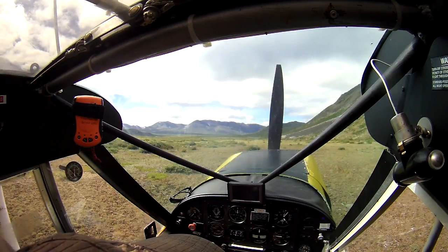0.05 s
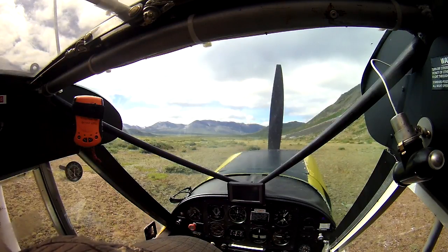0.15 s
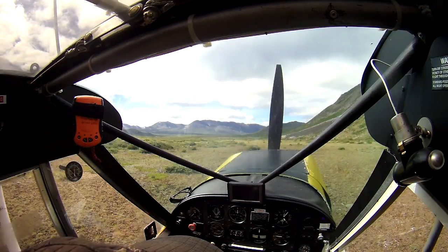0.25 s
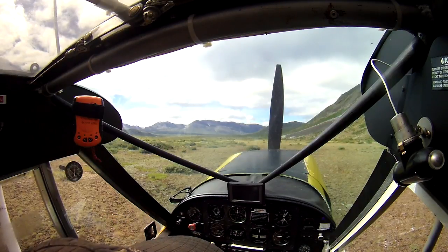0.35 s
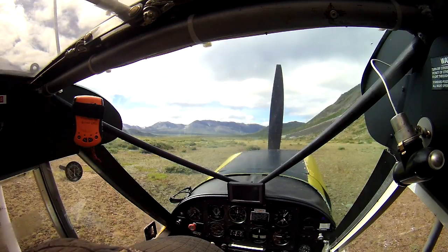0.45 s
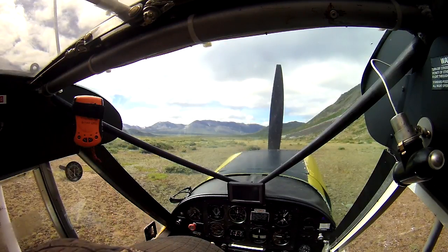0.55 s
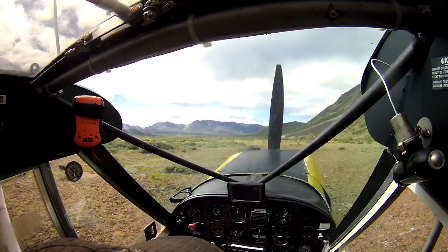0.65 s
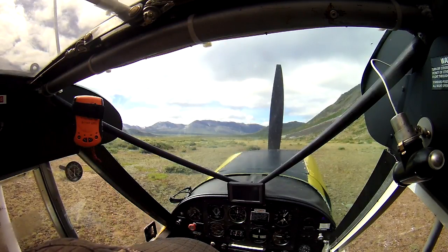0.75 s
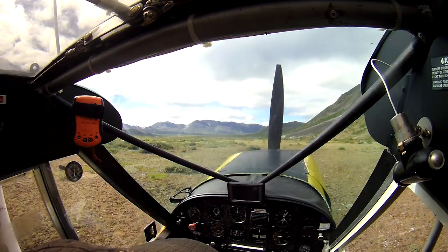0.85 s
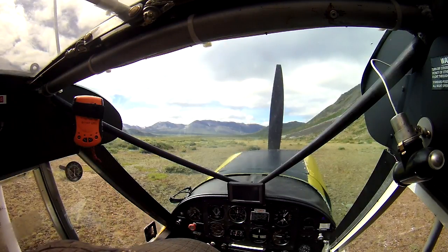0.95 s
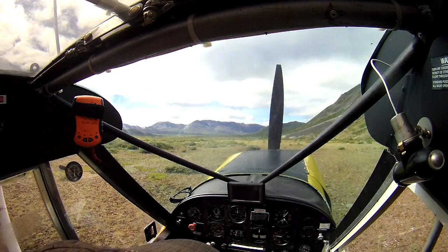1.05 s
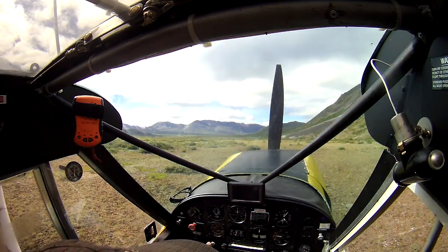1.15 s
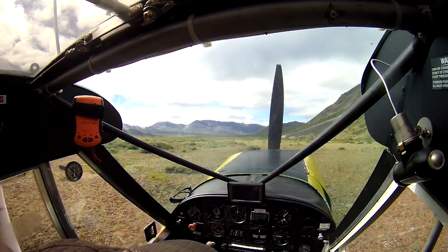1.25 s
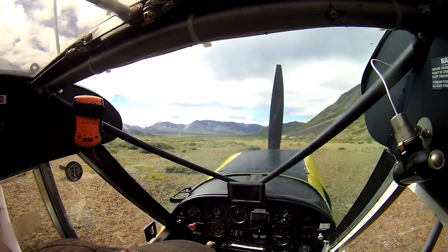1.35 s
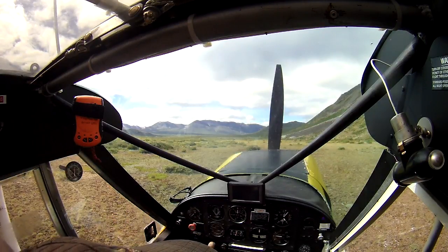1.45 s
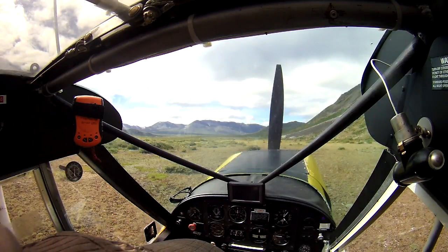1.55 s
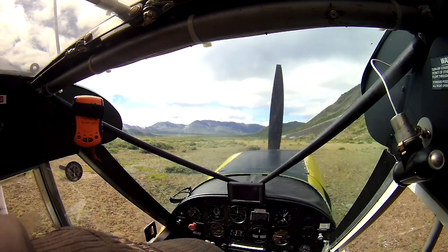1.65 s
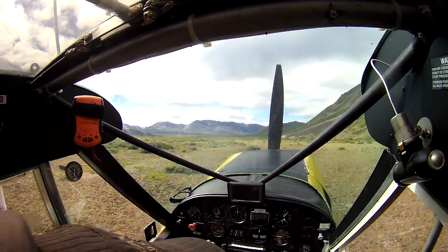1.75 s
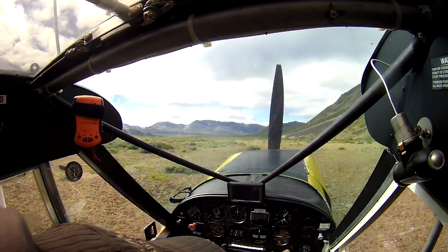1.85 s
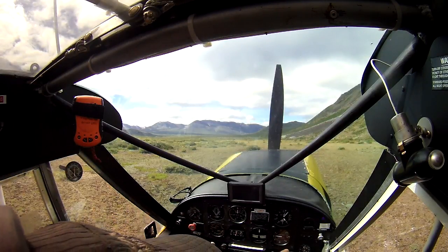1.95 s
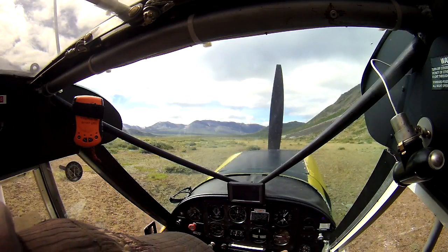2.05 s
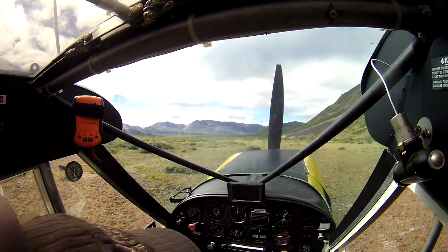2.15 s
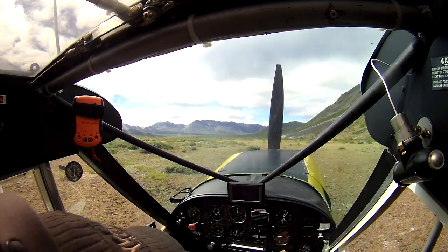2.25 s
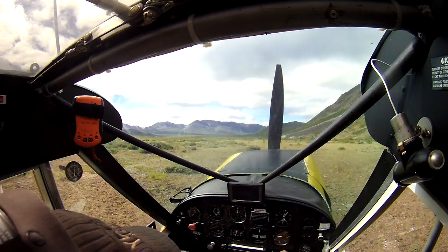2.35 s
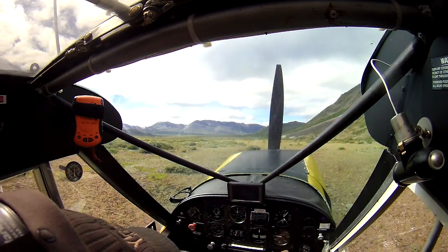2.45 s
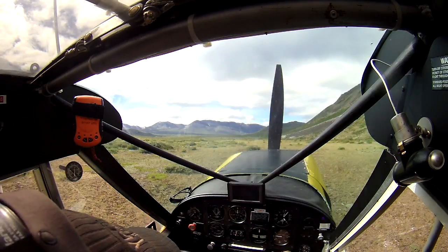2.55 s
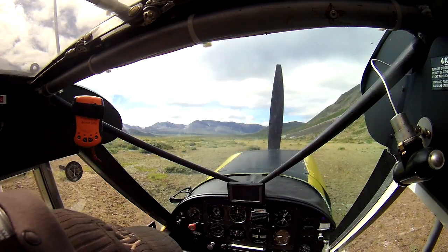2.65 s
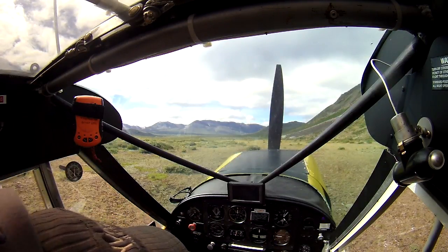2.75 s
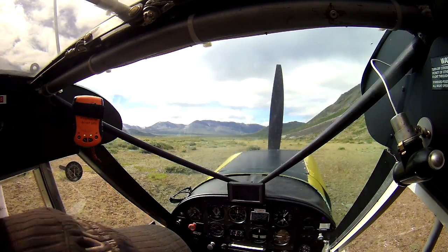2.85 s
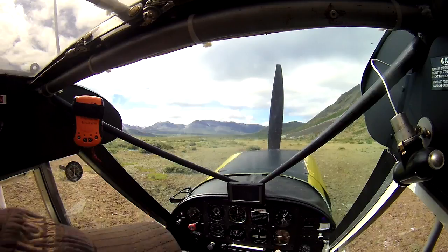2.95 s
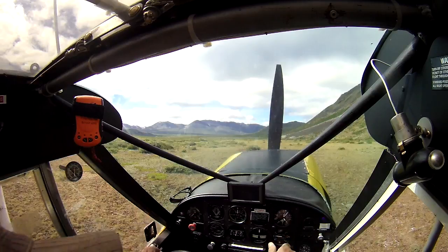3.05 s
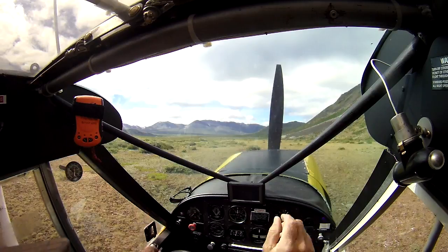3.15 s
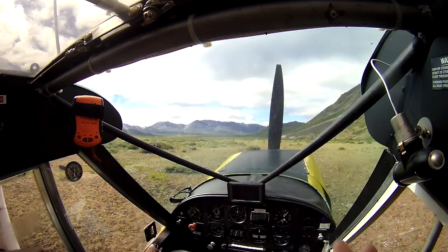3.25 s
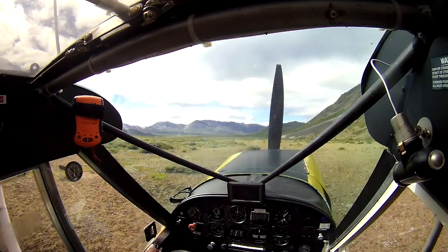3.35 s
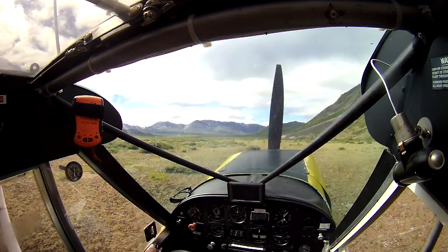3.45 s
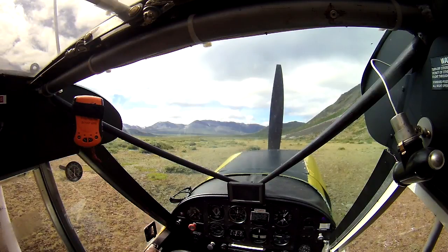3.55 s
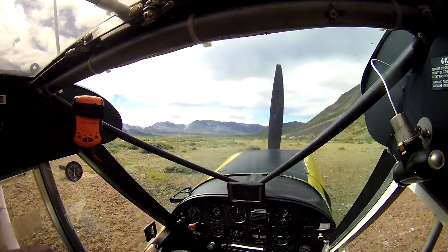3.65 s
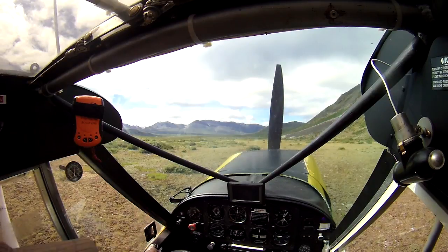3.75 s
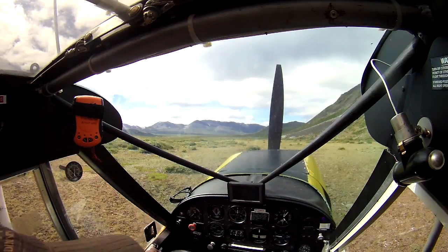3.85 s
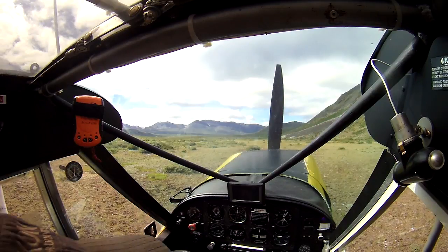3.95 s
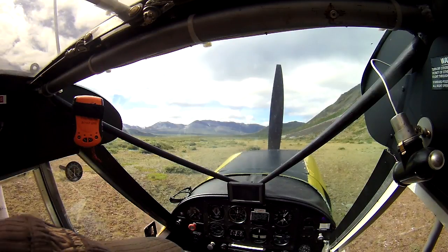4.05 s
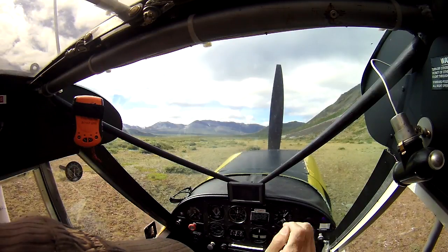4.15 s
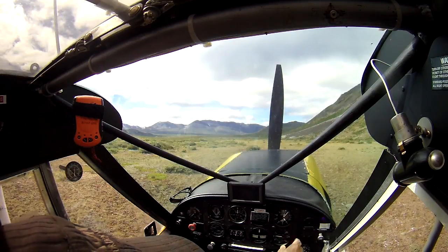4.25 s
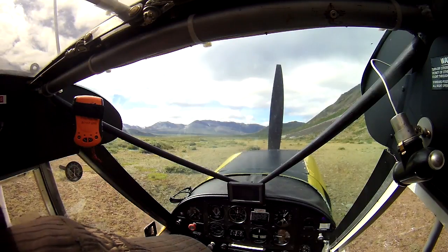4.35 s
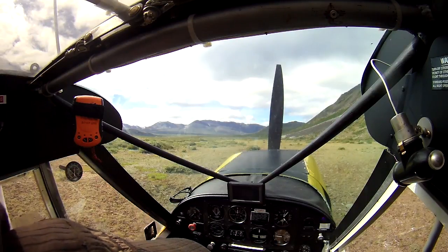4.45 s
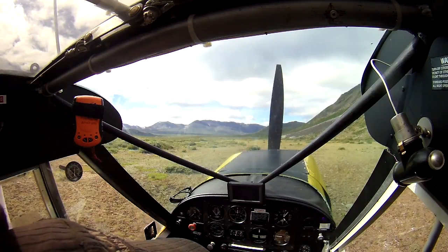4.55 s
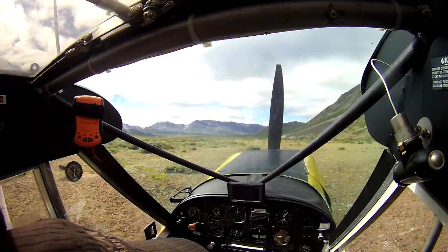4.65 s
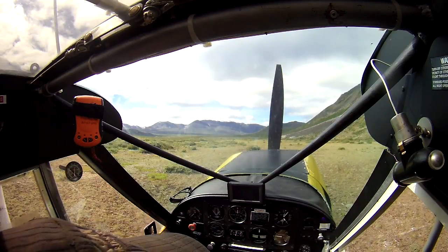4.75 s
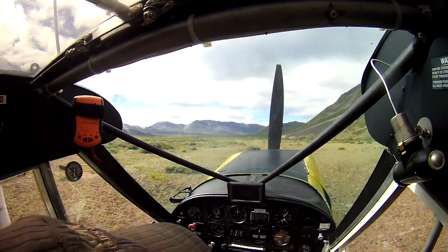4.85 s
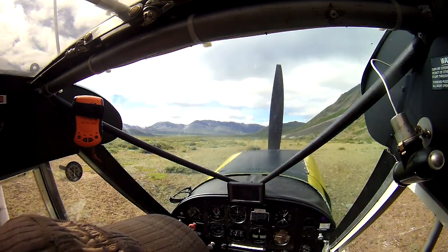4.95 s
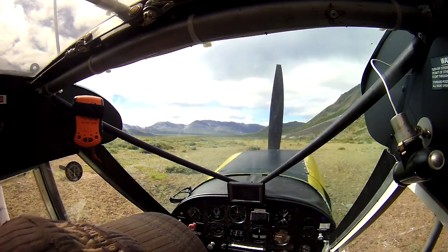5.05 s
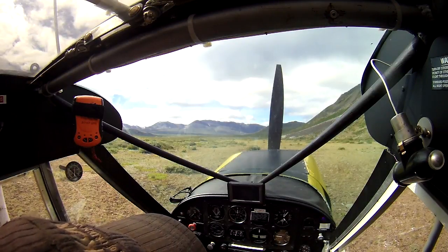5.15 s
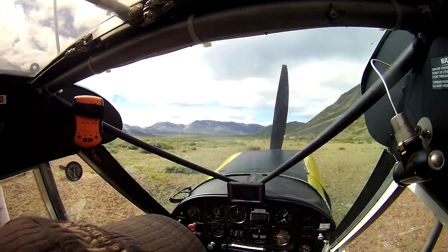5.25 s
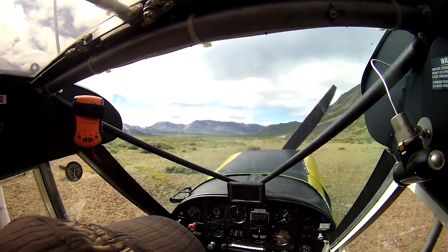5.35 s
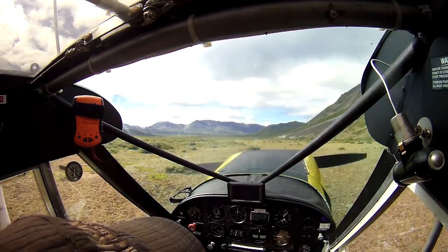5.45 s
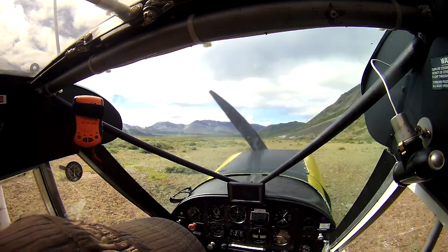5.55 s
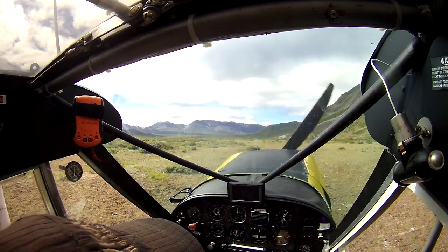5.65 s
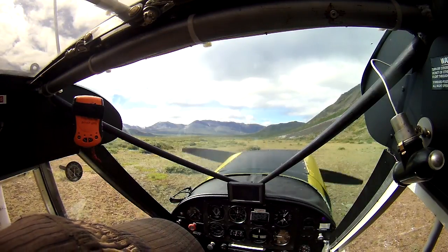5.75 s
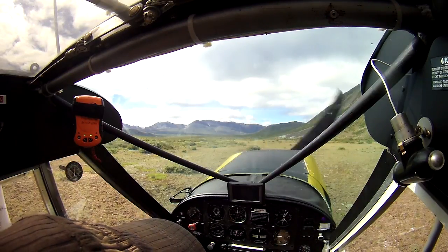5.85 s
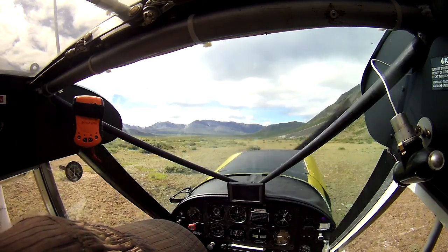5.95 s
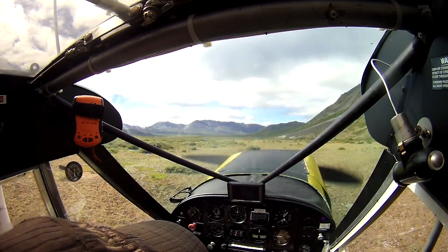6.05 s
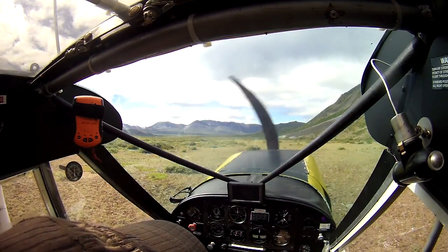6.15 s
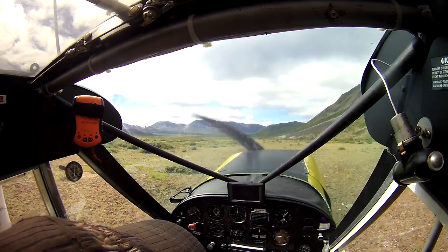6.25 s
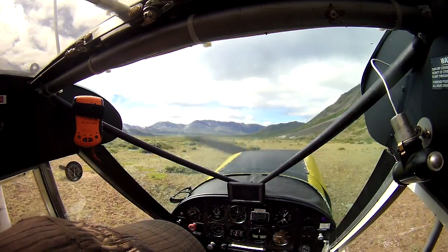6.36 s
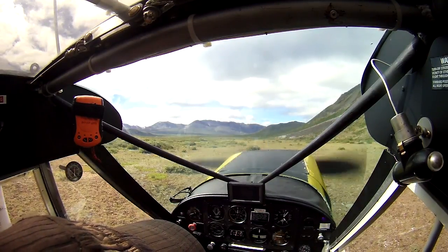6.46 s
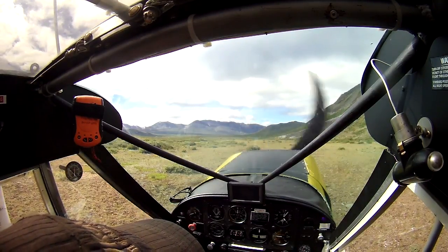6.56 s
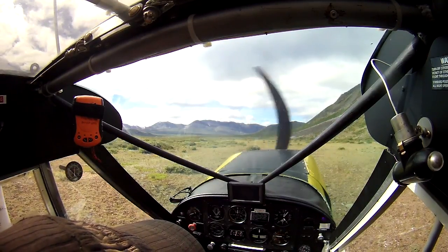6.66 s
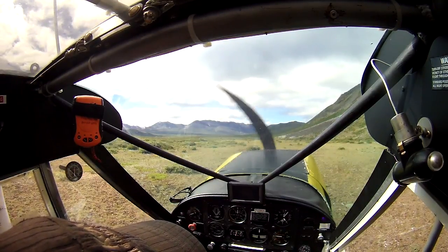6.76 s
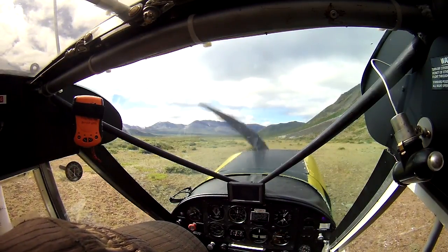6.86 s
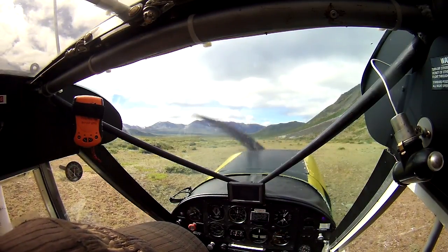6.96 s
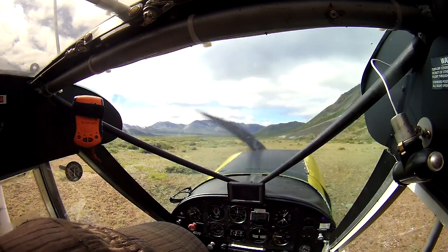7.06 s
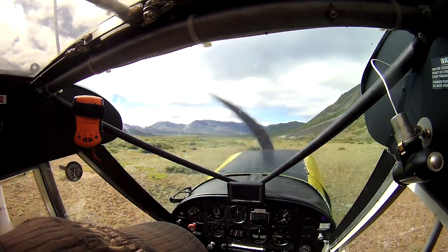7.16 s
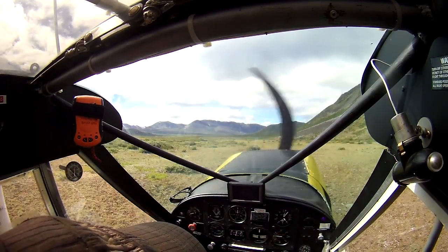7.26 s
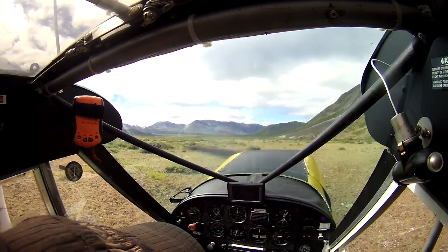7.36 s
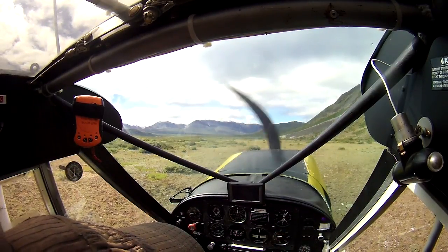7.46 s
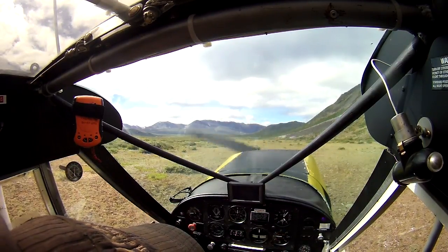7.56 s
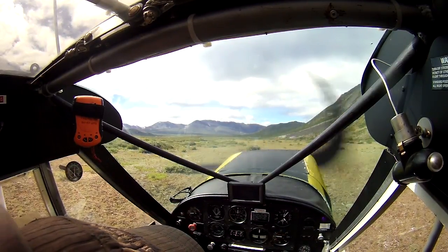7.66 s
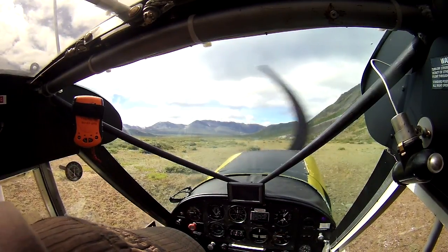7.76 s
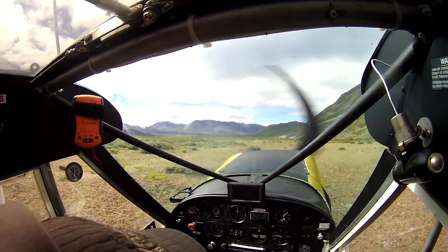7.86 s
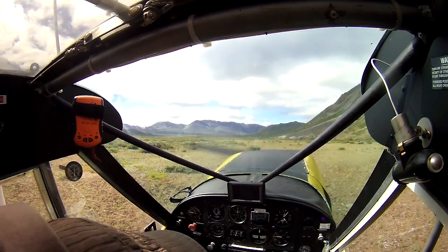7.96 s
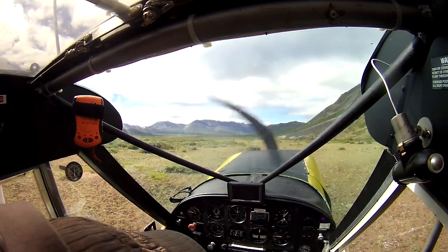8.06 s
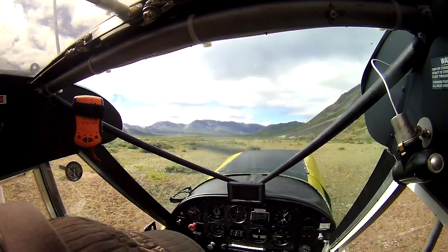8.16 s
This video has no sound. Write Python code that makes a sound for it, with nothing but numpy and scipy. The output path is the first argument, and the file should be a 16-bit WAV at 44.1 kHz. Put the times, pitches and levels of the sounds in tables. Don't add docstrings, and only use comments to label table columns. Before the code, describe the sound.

Inside a small piston aircraft, a microphone enclosed in a hard plastic case gives a boxy, ringing midrange and dull treble. From 0 to 5 s it is quiet: low wind rumble, slight hiss, a faint low panel hum swelling in gusts. Small ticks and switch clicks appear around 1.3, 2.4, 2.6 and 2.9 s, with soft sleeve rubs, strongest near 2.1 and from 3.3 to 4.2 s. A much louder sharp click cracks at 3.8 s. At 5.2 s a double clack and thump start the cranking; a low starter whine rises, falters and returns until 5.85 s, with metallic snaps and deep kicks through 6.4 s. The engine then catches, firing in slow separate throbs that speed up unevenly and grow stronger until the end at about 8 s, with rumble, drone and pulsing valve clatter. A loose part taps and buzzes most near 7.9 s.

```python
import sys
import numpy as np
from scipy import signal
from scipy.fft import rfft, irfft
from scipy.io import wavfile
from scipy.ndimage import uniform_filter1d

SR = 44100
rng = np.random.default_rng(int(sys.argv[2]) if len(sys.argv) > 2 else 0)


def boost_factor(decibels):
    exponent = np.asarray(decibels, float) / 20
    return 10 ** exponent


def to_wav(sig):
    pcm = np.clip(np.atleast_2d(sig), -1, 1) * 32767
    pcm = np.round(pcm).astype(np.int16)
    wavfile.write(sys.argv[1], SR, pcm.T)


N = 361619

# (mode_hz, width_hz, level_db)
CASE = [(381, 95, -13), (701, 143, -11.5), (917, 180, -18), (1236, 97, -3), (1884, 198, -9),
        (2004, 150, -2.5), (2280, 192, 3.5), (2737, 410, -12.5), (3210, 76, -12)]
WALL = signal.ellip(5, 1, 45, 3556, fs=SR, output="sos")


def unit(x):
    return x / np.sqrt(np.mean(x ** 2))


def curves(table):
    s, *columns = np.transpose(table)
    t = np.arange(N) / SR
    fade_s = .02
    gate = np.clip(np.minimum(t - s[0], s[-1] + fade_s - t) / fade_s, 0, 1)
    return [np.interp(t, s, c) for c in columns] + [gate]


def swells(table, rest_db):
    out = np.zeros(N) + boost_factor(rest_db)
    for s, length, db in table:
        add(out, boost_factor(db) * np.hanning(int(length * SR)), max(s - length / 2, 0))
    return 20 * np.log10(out)


def walk(rate):
    hold = int(SR / rate)
    steps = np.repeat(rng.standard_normal(N // hold + 1), hold)
    slewed = uniform_filter1d(uniform_filter1d(steps, hold), hold)
    return unit(slewed[:N])


def band(x, hz, width):
    return signal.lfilter(*signal.iirpeak(hz, hz / width, fs=SR), x)


def coloured(spectrum):
    hz, db = np.transpose(spectrum)
    shape_db = np.interp(np.log(np.fft.rfftfreq(N, 1 / SR) + 1), np.log(hz), db)
    return unit(irfft(rfft(rng.standard_normal(N)) * boost_factor(shape_db), N))


def ring(hz, t60):
    t = np.arange(int(t60 * SR)) / SR
    soft_start = 1 - np.exp(-4 * hz * t)
    return np.sin(2 * np.pi * hz * t) * 1000 ** (-t / t60) * soft_start


def add(out, x, s):
    i = int(s * SR)
    out[i:i + len(x)] += x[:N - i]


def case(x, modes=CASE, leak_db=-40.5):
    rung = sum(boost_factor(db) * band(band(x, hz, 0.99 * width), hz, 1.63 * width) for hz, width, db in modes)
    leak = boost_factor(leak_db) * band(x, 3100, 2500)
    return signal.sosfilt(WALL, rung + leak)


def seams(x):
    # (centre_hz, width_hz, level_db)
    seam_bands = [(4000, 700, -5), (4850, 1100, 0), (7300, 1500, -18)]
    out = np.zeros(N)
    for k, (hz, width, db) in enumerate(seam_bands):
        out += (-1) ** k * boost_factor(db) * band(band(x, hz, width), hz, width)
    return boost_factor(-42.5) * out


def cabin():
    # (frequency_hz, level_db_per_hz)
    wind_spectrum = [(5, -34), (10, 4.5), (27, 4), (52, -1), (150, -9.5), (300, -20.5), (540, -28.5),
                     (1000, -35), (3500, -44), (4200, -45.5), (8000, -47), (15000, -49.5), (16000, -66)]
    # (centre_s, length_s, level_db)
    rustle_swells = [
        (.75, 0.56, -95),
        (1.65, 0.65, -83.5),
        (2.08, 0.37, -74),
        (2.65, 0.46, -82.5),
        (3.28, 0.59, -77.5),
        (3.57, 0.16, -76.5),
        (4.17, 0.56, -76),
        (4.5, 0.17, -82.5),
        (4.9, 0.78, -95.5),
    ]
    # (centre_s, length_s, level_db)
    hum_swells = [
        (.4, .5, -87),
        (1.2, 0.63, -71.5),
        (1.95, 0.41, -64),
        (2.43, 0.15, -51),
        (3.15, 1, -58.5),
        (3.37, 0.2, -63),
        (3.79, 0.19, -59),
        (4.15, 0.5, -68.5),
        (4.7, 0.28, -64),
    ]
    # (time_s, unused)
    quiet_span = [(0., 0.), (5.17, 0.)]
    _, still = curves(quiet_span)
    wind = coloured(wind_spectrum) * boost_factor(-57.5)
    rub = rng.standard_normal(N) * boost_factor(1.5 * walk(150))
    cloth = unit(case(rub, [(2400, 2500, 0.), (1903, 44.4, 7.5)])) * boost_factor(swells(rustle_swells, -91.5))
    hum = unit(band(rng.standard_normal(N), 198.4, 4.9)) * boost_factor(swells(hum_swells, -80) - 4)
    return wind + still * (cloth + hum)


def clicks():
    # (start_s, peak_db, ring_hz, t60_s, body_db)
    switches = [(1.232, -58, 2410, 0.076, 2), (1.285, -49.5, 2050, 0.044, -1),
                (1.3365, -58, 2520, 0.043, -10), (1.4797, -57.5, 1840, .058, 2.5),
                (2.3835, -51, 2330, 0.053, -5), (2.391, -41, 3260, 0.035, -31),
                (2.3945, -41, 2400, 0.046, -7), (2.557, -50.5, 2350, 0.023, -11),
                (2.5656, -40.5, 2460, 0.027, -12), (2.8847, -58, 2360, 0.11, -7),
                (2.895, -49.5, 2400, 0.019, -14), (3.7596, -21.5, 2090, 0.031, -21),
                (3.897, -56, 2070, 0.062, -6), (4.362, -53.5, 2240, .031, -11),
                (5.0187, -56, 2030, 0.035, -14), (5.1975, -31.5, 2900, 0.057, -13),
                (5.199, -27, 1870, 0.096, -16.5), (5.2311, -42, 2180, 0.085, 0),
                (5.248, -34, 2300, 0.051, -3), (6.2393, -32, 2120, 0.16, -1.7)]
    # (start_s, peak_db, ring_hz)
    ticks = [(.1487, -70, 1880), (.2038, -60.5, 2050), (0.2695, -60.5, 1840), (.674, -67.5, 2280),
             (.8929, -66, 1940), (1.056, -65.5, 1260), (1.2215, -64.5, 2020), (1.6382, -67, 2440),
             (1.74, -67, 2010), (1.781, -61.5, 2180), (2.08, -61.5, 2550), (2.164, -58.5, 1790),
             (3.528, -64, 1990), (3.547, -66, 2900), (3.567, -64, 2000), (3.588, -58.5, 2000),
             (3.695, -60, 2000), (4.064, -65, 1980), (4.46, -69, 2400), (4.4763, -64, 2265),
             (4.5033, -63, 2610), (4.5304, -65, 2350), (5.1457, -64, 2240)]
    # (start_s, peak_db, t60_s)
    snaps = [(5.5139, -24, 0.05), (5.7853, -23.5, 0.023), (5.9306, -22, 0.013), (6.04, -29, .15),
             (6.0646, -25, 0.12), (6.1566, -33, 0.03), (6.2945, -21.5, 0.034), (6.308, -24, 0.036),
             (7.3443, -34, 0.033), (7.5072, -47.5, .12), (7.6919, -27, .03)]
    snap_hz = 2280
    events = []
    for row in switches:
        events.append((*row, -24.5 + 7 * np.log2(row[2] / snap_hz)))
    events += [(*row, 0.033, -8, -26) for row in ticks]
    events += [(s, db, snap_hz, t60, -17.5, -45.5) for s, db, t60 in snaps]
    out, t = np.zeros(N), np.arange(SR // 6) / SR
    for s, db, hz, t60, body_db, edge_db in events:
        noise = rng.standard_normal(len(t))
        fall = t / np.clip(t60, .012, .3)
        shape = (1 - np.exp(-t / 0.0012)) ** 2 * (1000 ** -fall + 0.14 * 1000 ** (-fall / 3.95))
        scuff = noise * shape
        snap = case(scuff, CASE[4:9] + [(hz, 320, 3)])
        snap += case(noise[::-1] * shape, [(2900, 680, -15.5), (1480, 1100, -22.0)])
        body = case(scuff, CASE[:4] + [(690, 130, -14.5)], leak_db=-58.5)
        edge = band(band(scuff, 4100, 2500), 3400, 4000)
        edge += 0.21 * band(scuff, 5200, 2100) + 0.051 * band(scuff, 9100, 6000)
        add(out, boost_factor(db) * snap / np.abs(snap).max(), s - .003)
        add(out, boost_factor(db + body_db) * body / np.abs(body).max(), s - .003)
        add(out, boost_factor(db + edge_db + 7.5) * edge / np.abs(edge).max(), s - .004)
    return out


def cranking():
    # (time_s, whine_hz, level_db)
    starter = [
        (5.3, 125.7, -37),
        (5.386, 139.4, -42.5),
        (5.448, 140.6, -32),
        (5.506, 153.8, -39.5),
        (5.588, 216.2, -48),
        (5.652, 207.4, -76),
        (5.702, 206.3, -48.5),
        (5.762, 179.3, -41),
        (5.85, 165, -54),
    ]
    # (start_s, peak_db, ring_hz, t60_s)
    kicks = [(1.289, -58.5, 375, 0.14), (1.291, -44, 98, 0.053), (1.5, -61, 221.4, 0.37),
             (2.406, -53, 208, 0.41), (3.766, -43.5, 37.4, 0.4), (3.762, -48, 385, 0.11),
             (3.763, -41, 109, 0.075), (5.235, -26, 69.2, 0.23), (5.24, -33.5, 204, 0.14),
             (5.245, -41.5, 627, 0.097), (2.582, -52, 158, 0.079), (5.299, -33.5, 41.9, 1.3),
             (5.883, -21.5, 31.8, 0.27), (5.99, -48, 59.4, 0.33), (6.06, -20.5, 29.3, 0.17),
             (6.152, -13.5, 46.2, 0.15), (6.214, -22.5, 42.5, 0.15), (6.277, -14, 45.2, 0.17),
             (6.375, -17.5, 30.8, 0.32)]
    hz, db, on = curves(starter)
    phase = 2 * np.pi * np.cumsum(hz) / SR
    harmonics = [(1., 1.0), (2., -20.5), (3., -27.0)]  # multiple, dB
    whine = sum(boost_factor(part_db) * np.sin(k * phase) for k, part_db in harmonics)
    out = on * np.sqrt(2) * boost_factor(db) * whine
    for s, peak_db, ring_hz, t60 in kicks:
        add(out, boost_factor(peak_db + 5.5) * ring(ring_hz, t60), s)
    return out


def valve_gear(firings, running, level_db, depth):
    valves = [(.99, .7), (.26, 1.), (.42, .4)]

    def half(lag):
        return uniform_filter1d(1. * ((firings - lag) % 1 < .56 + .06 * walk(20)), 250)

    strikes = (rng.random(N) < 160 / SR) * rng.random(N) * (.4 + .2 * running)
    seats = sum(size * (np.diff((firings - place) % 1, prepend=0) < -.5) for place, size in valves)
    seats = seats * boost_factor(3 * walk(60))
    decay = np.exp(-1 / (0.0028 * SR))
    grain = .4 + signal.lfilter([1], [1, -decay], strikes + 1.1 * depth * seats)
    upper = rng.standard_normal(N) * (1 + depth * (.8 * half(-.07) - .55)) * grain
    lower = rng.standard_normal(N) * (1 + depth * (.6 * half(.12) - .35)) * boost_factor(2.42 * walk(45))
    air = rng.standard_normal(N) * (0.94 + 0.6 * running) * np.sqrt(grain)
    air = air * boost_factor(2.2 * walk(30) + 1.4 * walk(4.1))
    gear = case(upper, CASE[4:9]) + case(lower, CASE[:4]) + seams(air)
    return unit(gear) * boost_factor(level_db - 2.5)


def loose_part(firings, rattle_db):
    beat = (2 * firings - .24) % 1
    blow = 8 * (np.diff(beat, prepend=0) < 0) + rng.standard_normal(N) * np.exp(-beat / .08)
    contact = np.clip((rattle_db + 54) / 5, 0, 1)
    tap_db = rattle_db + 1.5 * np.cos(2 * np.pi * (firings - .15)) + .8 * walk(60)
    taps = blow * boost_factor(tap_db) * contact
    buzz = rng.standard_normal(N) * boost_factor(rattle_db + 10.0)
    tapped = 220 * seams(band(taps, 5400, 2200))
    tapped += 14 * case(taps, [(2590, 450, 2.0), (3590, 370, -16), (1520, 510, -4.5)])
    hiss = 4.1 * seams(buzz) + boost_factor(-41) * band(buzz, 7500, 4500)
    return tapped + hiss + case(buzz, [(940, 940, 2.5), (1626, 220, 9.5), (2900, 520, -5.5)])


def engine():
    # (time_s, firing_hz)
    firing = [(6.4, 12.8), (6.55, 19.44), (6.7, 17.85), (6.85, 18.17), (7, 19.76), (7.15, 20.31),
              (7.3, 22.46), (7.45, 27.51), (7.6, 25.27), (7.75, 30.64), (7.9, 30.27), (8.05, 34.35),
              (8.2, 35)]
    # (time_s, clatter_db of moving parts, power_db of combustion)
    effort = [(5.2, -37.5, -44), (5.3, -52.5, -24), (5.41, -43, -27), (5.68, -43.5, -40.5),
              (5.79, -45, -34), (5.92, -41, -29.5), (6.08, -39.5, -20.5), (6.35, -41.5, -17),
              (6.55, -45, -21.5), (6.7, -47, -25), (6.93, -45, -19), (7.15, -41.5, -13.5), (7.43, -42, -20),
              (7.62, -43.5, -17.5), (7.75, -41.5, -16), (7.87, -37, -14), (8.05, -39, -13),
              (8.2, -38.5, -13)]
    # (centre_s, length_s, level_db)
    tapping = [
        (7.7, .6, -56.5),
        (7.88, .3, -45.5),
        (8.085, 0.23, -55),
    ]
    # (multiple, level_db at mid effort, db_per_octave of speed, share of power)
    low_orders = [(1., -30, 9, 0.39), (2., -28, -5, 1), (3., -43.5, -2, 0.13)]
    # (multiple, level_db)
    upper_orders = [(.5, -11.5), (1.5, -10.5), (2.5, -9), (4, 2.5), (5, -10.5), (6, -6), (7, -16),
                    (8, -12.5), (10, -14)]
    # (frequency_hz, level_db_per_hz)
    rumble_spectrum = [(7.1, -42), (12, 1), (32, -14.5), (48, 7.5), (60, -1), (108, -15), (130, -23.5),
                       (170, -31), (290, -120)]
    # (frequency_hz, level_db_per_hz)
    drone_spectrum = [(53, -17), (90, -6), (124, 0.5), (156, -6), (206, -3.5), (263, -11.5), (328, -29.5),
                      (397, -17.5), (449, -30.5), (560, -44.5), (730, -54.5), (1230, -120)]
    mid_hz, mid_clatter_db, mid_power_db, mid_tap_db = 25, -43, -18, -60

    hz, running = curves(firing)
    firings = np.cumsum(hz * (running > 0)) / SR
    clatter_db, power_db, shaking = curves(effort)
    octaves = np.log2(hz / mid_hz)
    surge = power_db - mid_power_db
    rattle_db = swells(tapping, -60.5 + 8.5 * octaves)
    tap_effort = rattle_db - mid_tap_db

    orders = [(k, db + per_octave * octaves + share * surge) for k, db, per_octave, share in low_orders]
    third_db = orders[-1][1]
    for k, db in upper_orders:
        orders.append((k, third_db + db + 0.26 * tap_effort + 4 * walk(9.7)))
    cycle = firings + 0.016 * walk(8.1) + .45
    throb = np.sqrt(2) * sum(boost_factor(db) * np.cos(2 * np.pi * (k * cycle - .65)) for k, db in orders)

    rumble = coloured(rumble_spectrum) * boost_factor(power_db - 7 - 8 * running)
    drone_db = -41 + 3 * (1 - running)
    drone_db = drone_db + 0.56 * (clatter_db - mid_clatter_db) + 0.42 * surge + 0.51 * running * tap_effort
    drone = coloured(drone_spectrum) * boost_factor(drone_db + 2 * walk(25))

    depth = running * np.clip(-(rattle_db + 45) / 14, .2, 1)
    clatter = valve_gear(firings, running, clatter_db, depth) + running * loose_part(firings, rattle_db)
    return running * throb + shaking * (clatter + rumble + drone)


def scene():
    return (cabin() + clicks() + cranking() + engine())[None]


def roll_off(x):
    return signal.sosfilt(signal.butter(12, 15719, fs=SR, output="sos"), x)


def record(dry):
    return roll_off(dry)


dry = scene()
out = record(dry)
to_wav(out)
```